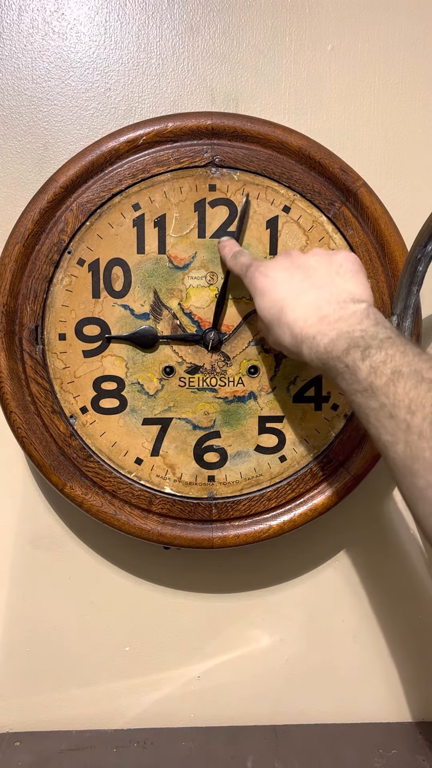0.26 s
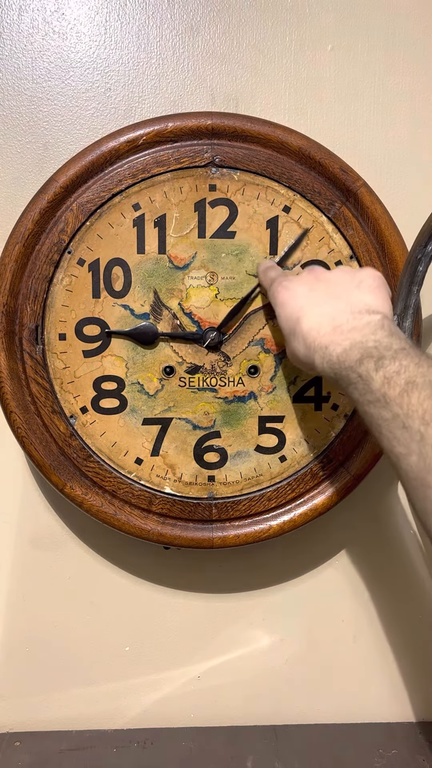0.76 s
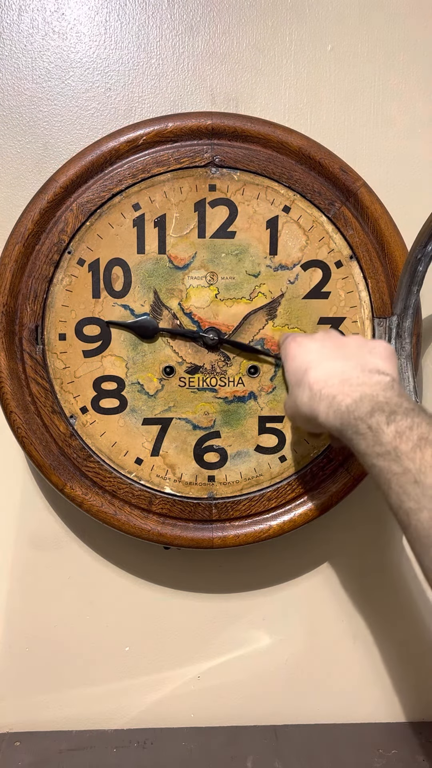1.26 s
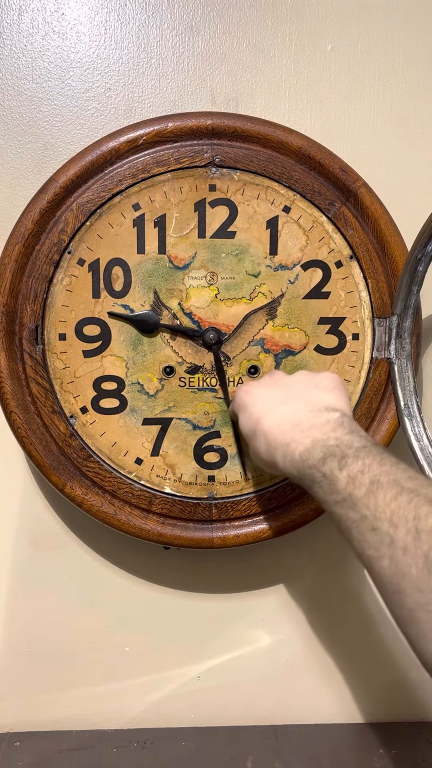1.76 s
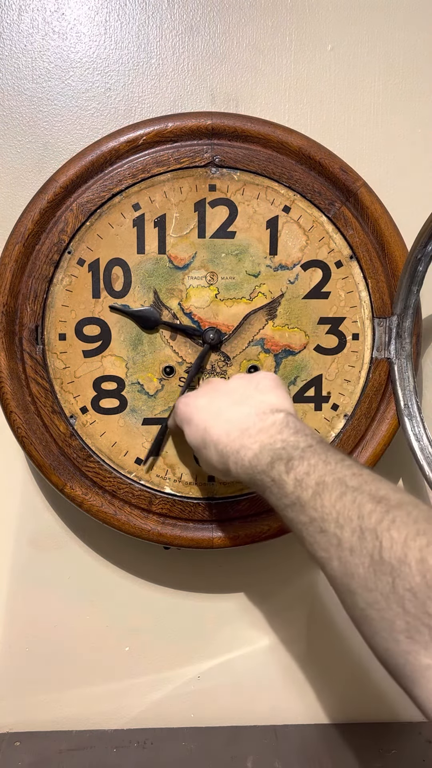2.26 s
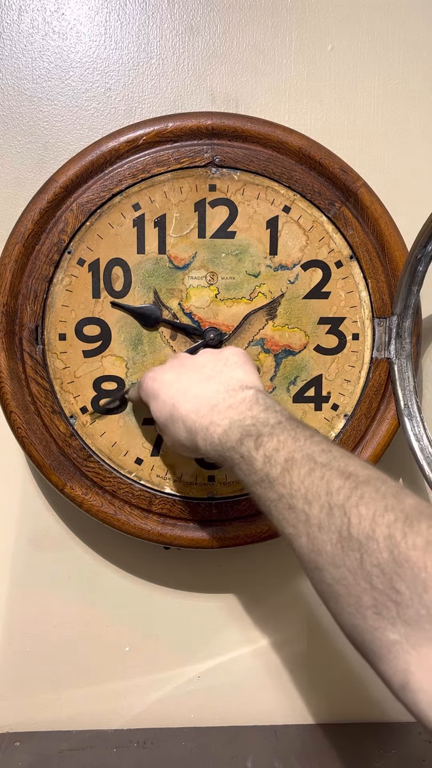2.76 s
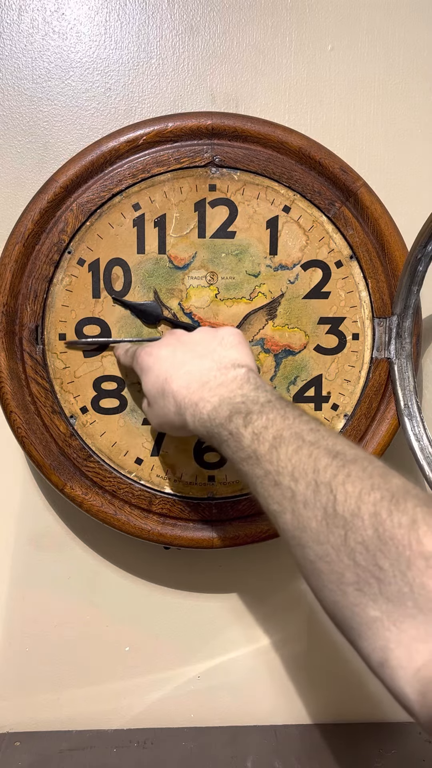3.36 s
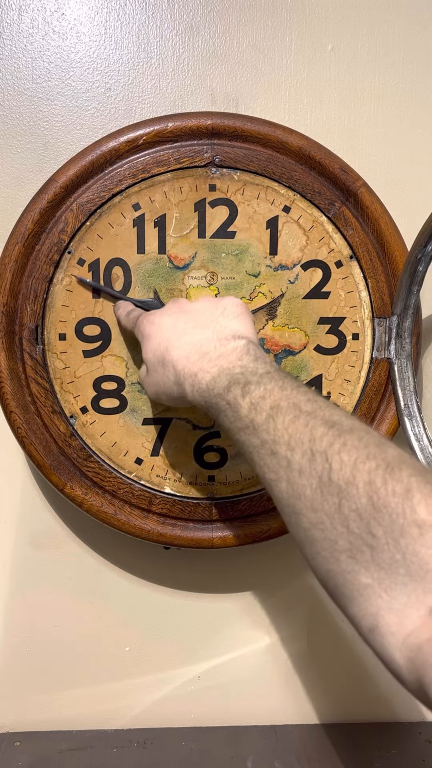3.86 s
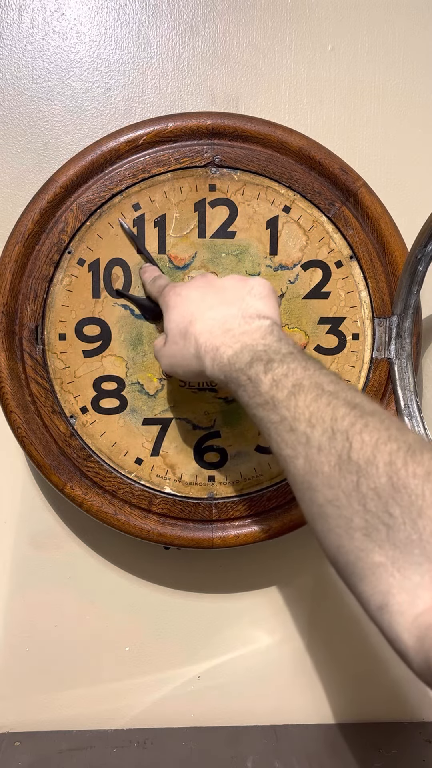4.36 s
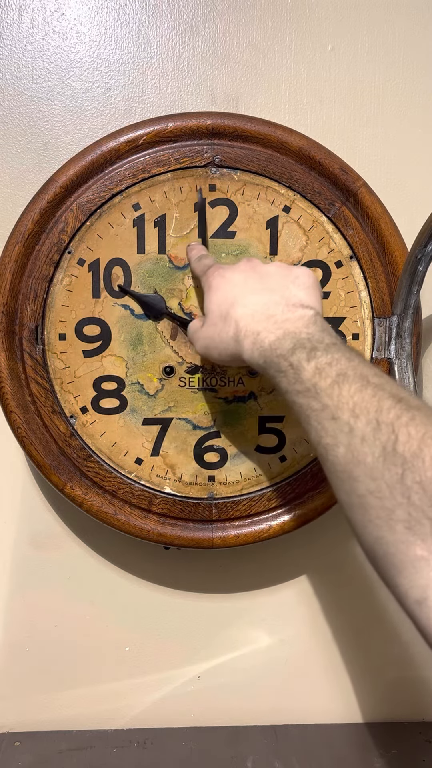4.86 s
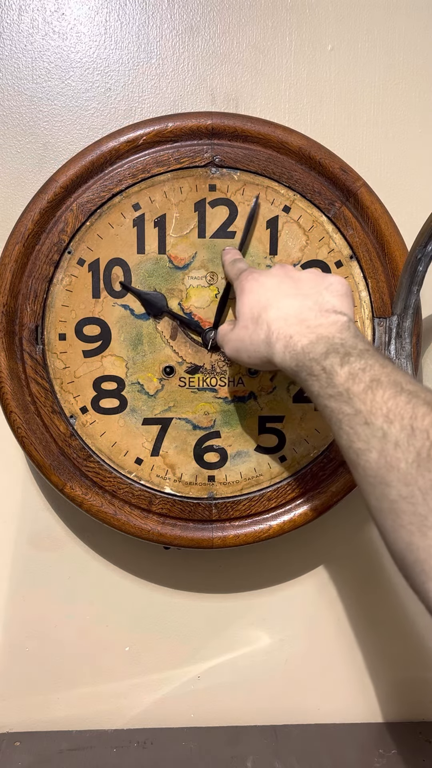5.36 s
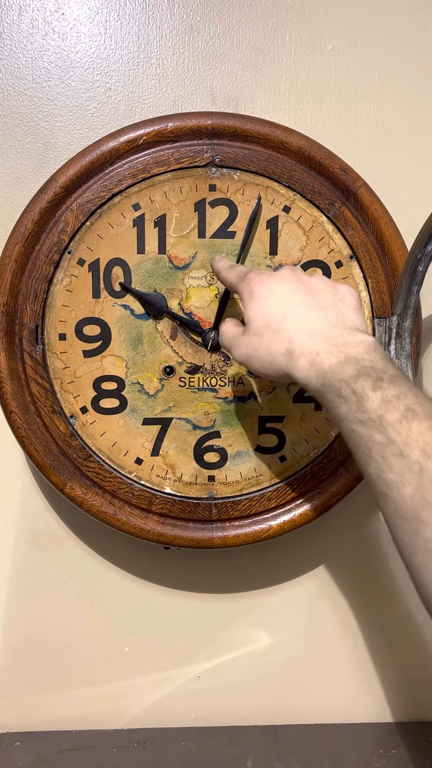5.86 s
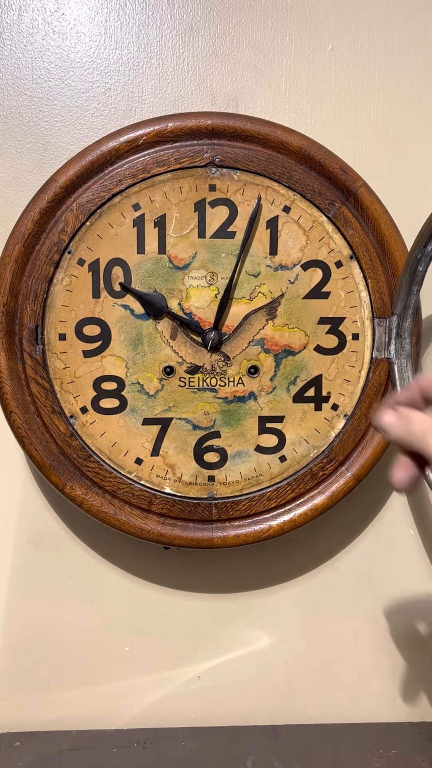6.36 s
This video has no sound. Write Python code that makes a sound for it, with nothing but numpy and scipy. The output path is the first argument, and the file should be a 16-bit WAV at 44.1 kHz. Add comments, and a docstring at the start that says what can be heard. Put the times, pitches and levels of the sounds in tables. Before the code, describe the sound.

Wooden clock knocks and ticks in a quiet humming room, soft friction rubs, a growing mechanical whirr, and a single metallic strike at the end.

```python
"""Setting a pendulum wall clock to the hour

In a quiet, faintly humming room a finger pushes the minute hand round: swarms of tiny slips groan and scrape.
The escapement ticks unevenly and levers knock: short bursts of contacts ring the modes of the wooden case.
The strike train's whirr, toothed noise through wheel resonances, grows louder until the hammer, a noise burst,
falls on a coiled wire gong made of decaying sine modes."""
import sys
import numpy as np
from scipy import signal
from scipy.fft import rfft, irfft
from scipy.io import wavfile
from scipy.ndimage import uniform_filter1d

SR = 44100
rng = np.random.default_rng(int(sys.argv[2]) if len(sys.argv) > 2 else 0)


def put_to_file(sound):
    """Save the sound as 16-bit audio at rate SR, in the file named by the first command-line argument."""
    columns = np.atleast_2d(sound).T  # one column per channel
    safe = np.clip(columns, -1, 1)
    whole_steps = np.round(safe * 32767)
    wavfile.write(sys.argv[1], SR, whole_steps.astype(np.int16))


N = 291942
TIME = np.arange(N) / SR
BINS = np.fft.rfftfreq(8192, 1 / SR)  # frequencies in Hz on which every colour is drawn
STRIKE_S = 6.526  # the hammer meets the gong


def amp(db):
    """Decibels to a linear factor."""
    return 10 ** (np.asarray(db) / 20)


def evened(x):
    """Scales to rms 1."""
    return x / np.sqrt(np.mean(x ** 2) + 1e-20)


def read(points, hz):
    """Reads a spectrum on a log-frequency axis."""
    f, value = np.transpose(points)
    return np.interp(np.log(hz + 1), np.log(f + 1), value)


def band(hz, octaves):
    """A bell on the log-frequency axis, 1 at its centre."""
    return np.exp(-.5 * (np.log2((BINS + 1) / hz) / octaves) ** 2)


def drift(size):
    """Smooth chance of rms 1 that changes over about size samples."""
    smooth = uniform_filter1d(rng.standard_normal(N), size)
    return evened(uniform_filter1d(smooth, size // 2))


def add(mix, s, sound):
    """Mixes a two-channel sound in at time s."""
    part = mix[:, round(s * SR):][:, :sound.shape[1]]
    part += sound[:, :part.shape[1]]


def body(spectrum, modes=()):
    """Gain of a broad spectrum with resonances standing on it; their powers add."""
    peaks = sum(amp(db) ** 2 / (1 + ((BINS - hz) / width) ** 2 * 2) ** 2 for hz, width, db in modes)
    return np.sqrt(amp(read(spectrum, BINS)) ** 2 + peaks)


def ring(x, gain):
    """Minimum-phase filter with the given gain: resonances ring after the blow, never ahead of it."""
    log_gain = np.log(np.r_[gain, gain[-2:0:-1]] + 1e-6)
    minimum_phase = np.exp(np.conj(signal.hilbert(log_gain)))
    response = np.fft.ifft(minimum_phase).real[:len(BINS)]
    return signal.fftconvolve(x, response[None], axes=1)[:, :x.shape[1]]


def ports(x):
    """Mid and side to left and right: wide in the middle range, near mono in bass, narrow about 1.9 kHz."""
    # Stereo width of the microphone pair. Each row: frequency in Hz, gain of the side signal in dB.
    side_width = [(40, -15.5), (120, -12), (300, -6.5), (600, -1), (1200, -4.5), (1750, -0.5), (1920, -17),
                  (3000, -9.5), (6000, 1.5), (8000, -4)]
    side_gain = amp(read(side_width, np.fft.rfftfreq(N, 1 / SR)))
    side = irfft(rfft(x[1]) * side_gain, N)
    return np.array([x[0] + side, x[0] - side])


def room_tail(size):
    """Diffuse reflections of energy 1, each band dying at its own speed."""
    # Reverberation of the room. Each row: frequency in Hz, time to fall by 60 dB in seconds.
    decay_times = [(150, 0.69), (500, 0.21), (1700, 0.23), (4500, 0.25), (10000, 0.17)]
    hz, t, grains = signal.stft(rng.standard_normal((2, size)), SR, nperseg=256)
    fading = grains * amp(-60 * t / read(decay_times, hz)[:, None])
    tail = signal.istft(fading, SR, nperseg=256)[1][:, :size]
    return evened(tail) / np.sqrt(size)


def still_room(air_db=-59.0, rumble_offset_db=60.5, rumble_hz=140, waver=.25):
    """Room tone: noise with a swelling low rumble and faint hiss, under sines that waver in level."""
    # Colour of the still air. Each row: frequency in Hz, relative density in dB per Hz.
    air_colour = [(15, -46.5), (25, -21.5), (31, -0.5), (45, 0.5), (80, -3), (115, -9), (150, -16.5),
                  (300, -23.5), (600, -37.5), (1100, -33), (1650, -23), (2100, -40), (4200, -50.5),
                  (6800, -58), (11000, -60), (12500, -73)]
    # Swells of the rumble. Each row: time in seconds, level in dB before rumble_offset_db is added.
    rumble_swells = [(0, -61.5), (.68, -55), (1.3, -58.5), (2.3, -62.5), (2.6, -58.5), (3.2, -61),
                     (4.35, -62.5), (4.7, -58), (6.1, -61), (6.4, -55)]
    # Mains and motor hum. Each row: frequency in Hz, rms level in dB before the waver.
    hum_tones = [(47, -67), (119.8, -68), (240, -82), (358, -84.5)]
    noise = rng.standard_normal((2, N + SR))
    air = amp(air_db) * evened(ring(noise, body(air_colour))[:, SR:])  # drops the filter's start-up
    rumble = signal.sosfiltfilt(signal.butter(2, rumble_hz, fs=SR, output="sos"), air)
    swell_db = np.interp(TIME, *np.transpose(rumble_swells)) + rumble_offset_db
    air = air + rumble * (amp(swell_db) - 1)
    hum = sum(amp(db) * np.sqrt(2) * np.sin(2 * np.pi * (hz * TIME + rng.random()))
              * (1 + waver * drift(size=6000)) for hz, db in hum_tones)
    return ports(air) + hum


def rub(s, length, db, hz, slips_per_s=1100, grain_db=1.0, octaves=0.26, skirt_db=-13, skirt_octaves=1, room_db=-5):
    """A short swarm of tiny slips that sounds one resonance; gives its start time and sound."""
    t = np.arange(SR // 3) / SR
    slips = (rng.random((2, len(t))) < slips_per_s / SR) * rng.choice([-1, 1], (2, len(t)))
    swell = np.sin(np.pi * np.minimum(t / length, 1)) ** 2
    slips = slips * amp(grain_db * rng.standard_normal(len(t))) * swell
    reflections = signal.fftconvolve(slips, room_tail(size=8192), axes=1)[:, :len(t)]
    slips = slips + amp(room_db) * reflections
    colour = band(hz, octaves) + amp(skirt_db) * band(hz, skirt_octaves) + amp(-60)
    sound = ring(slips, colour / (1 + (BINS / 7000) ** 10))  # soft skin makes no high treble
    return max(s - length / 2, 0), amp(db) * evened(sound) * np.sqrt(length / t[-1])  # db: rms over length


def rubs(count=38, step_s=.095, groan_hz=621, scrape_hz=2410, scatter_octaves=.11, scatter_db=1):
    """Stick-slip: the hand advances in uneven steps, as loud as the friction is high; a few rubs stand out."""
    # Friction of the pushed hand. Each row: time in seconds, groan of the clutch in dB,
    # scrape on the dial in dB, both before the scatter.
    friction = [(0, -89, -89), (.45, -74.5, -94), (.6, -74, -83), (1.15, -81, -95.5), (1.9, -80.5, -85.5),
                (2.3, -75, -82.5), (2.75, -75.5, -85), (3.1, -88.5, -92), (3.3, -87, -84.5),
                (3.7, -78, -83.5), (4.15, -85.5, -96), (4.35, -89, -79.5), (4.68, -71, -78.5),
                (4.95, -87, -82)]
    # Low groans to thin scrapes that stand out. Each row: middle in seconds, length in seconds,
    # level in dB, centre in Hz.
    loud_rubs = [(0.662, .086, -60.5, 317), (0.654, 0.18, -88.5, 7060), (.928, 0.096, -71.5, 577),
                 (2.347, 0.11, -67, 610), (2.601, .12, -66.5, 193), (3.686, 0.11, -74.5, 486),
                 (4.454, 0.11, -73, 560), (4.666, 0.17, -87.5, 5660), (6.335, 0.093, -59, 211)]
    out = np.zeros((2, N))
    times, groan_db, scrape_db = np.transpose(friction)
    steps = times[-1] * (np.arange(count) + rng.uniform(.15, .85, count)) / count
    for s, chance in zip(steps, rng.standard_normal((count, 2, 2))):
        for levels, hz, (loud, high) in zip([groan_db, scrape_db], [groan_hz, scrape_hz], chance):
            db = np.interp(s, times, levels) + scatter_db * loud
            add(out, *rub(s, step_s, db, hz * 2 ** (scatter_octaves * high)))
    for row in loud_rubs:
        add(out, *rub(*row))
    return out


def contacts(t, rebound, first, last, seat_s, rattle_s, rise_s=0.0015):
    """Metal lands, seats and rebounds; each contact spreads through the plates and rattles them briefly."""
    ages = np.maximum(t - np.array([[0], [seat_s], [rebound]]), 0)
    envelopes = (1 - np.exp(-ages / rise_s)) * np.exp(-ages / rattle_s)
    power = np.square([first, 1, last]) @ envelopes ** 2
    return rng.choice([-1, 1], (2, len(t))) * np.sqrt(power / power.sum())


def blows(rows, crack, case_db, first, last, seat_s, rattle_s, room_db, thud_octaves, bright_hz, length_s):
    """Each blow rings the case and the room; its level is the rms over length_s."""
    # Brass movement in its wooden case. Each row: mode in Hz, width in Hz, level in dB before case_db is added.
    case_modes = [(319, 57, -6), (480.5, 26.5, -9.5), (620.5, 31.6, -3.5), (1066, 57, -7.5),
                  (1287, 20, -1.5), (1396, 43, -5), (1657, 202, 1), (1668, 120, 2), (2037, 48, -4),
                  (2290, 260, -9), (2920, 43, -23), (3065, 38, -14.5), (4340, 140, -23.5),
                  (4685, 104, -22.5), (5970, 194, -25), (9800, 580, -37.5), (11900, 100, -70),
                  (11830, 250, -47)]
    out, t = np.zeros((2, N)), np.arange(SR // 2) / SR
    colour = body(crack, [(hz, width, db + read(case_db, hz)) for hz, width, db in case_modes])
    treble = 1 / (1 + (bright_hz / (BINS + 1)) ** 4)  # shelf that the brightness lifts or lowers
    for s, db, thud_db, thud_hz, bright_db, rebound in rows:
        drive = contacts(t, rebound, first, last, seat_s, rattle_s) + amp(room_db) * room_tail(len(t))
        tilt_db = thud_db * band(thud_hz, thud_octaves) + bright_db * treble
        sound = ring(drive, colour * amp(tilt_db))
        unit = sound / np.linalg.norm(sound, axis=1, keepdims=True)
        add(out, s, amp(db) * unit * np.sqrt(length_s * SR))
    return out


def escapement(thud_hz=(471, 980), bright_db=1.15):
    """Two pallets stop the escape wheel in turn, tick and tock; each has its own thud pitch and case drive."""
    # Beats, entry and exit pallet in turn. Each row: start in seconds, level in dB, wooden thud in dB,
    # last rebound in seconds after the start.
    ticks = [(.219, -56, 9, 0.019), (.694, -48.5, 7.5, 0.02), (1.293, -48, 11.5, 0.0076),
             (1.769, -48, 5, 0.013), (2.376, -49, 17.5, 0.013), (2.856, -49, 0.5, 0.018),
             (3.454, -49.5, 10.5, .019), (3.929, -47, 1.5, 0.015), (4.530, -47.5, 9, 0.0063),
             (5.617, -52.5, 4, 0.021), (6.110, -50.5, 0.5, .012)]
    # Broad crack of a pallet. Each row: frequency in Hz, level in dB.
    pallet_crack = [(100, -27), (250, -12.5), (800, -18.5), (1600, -10.5), (3300, -23.5), (5200, -30),
                    (7200, -44), (10500, -42.5), (12500, -78)]
    # How strongly each pallet drives the case modes. Each row: frequency in Hz, drive in dB.
    entry_drive = [(500, -0.5), (1300, -0.5), (1690, 1), (2030, 3.5), (2350, 2.5), (4700, 7.5), (6000, -23),
                   (10000, 5.5)]
    exit_drive = [(500, -2.5), (1300, 0), (1690, -2), (2030, 3.5), (2350, 0.5), (4700, 3), (6000, 2),
                  (10000, 2)]
    out = np.zeros((2, N))
    for k, drive in enumerate([entry_drive, exit_drive]):
        beats = [(s, db, thud_db, thud_hz[k], bright_db, rebound) for s, db, thud_db, rebound in ticks[k::2]]
        out += blows(beats, pallet_crack, drive, first=0.62, last=0.75, seat_s=0.008, rattle_s=0.012,
                     room_db=0, thud_octaves=0.25, bright_hz=2940, length_s=0.03)
    return out


def levers(rebound_s=.017):
    """Strike levers, gear slack and the loose hand knock in the case, with a broader thud than the ticks."""
    # Knocks. Each row: start in seconds, level in dB, wooden thud in dB, thud centre in Hz, brightness in dB.
    knocks = [(.262, -58, 6, 330, -2), (.312, -58, 16.5, 460, 2), (.583, -59.5, 14.5, 417, 10.5),
              (0.611, -53, 17, 500, -7), (0.796, -56.5, 14.5, 390, -22), (1.022, -69, 20, 395, 22),
              (1.425, -59.5, 13.5, 376, -7), (2.215, -56.5, 20, 296, -16), (2.584, -56, 28.5, 700, -12),
              (2.687, -65.5, 35, 960, 3), (4.710, -49.5, 4.5, 348, 10), (5.002, -52, 1, 400, 6.5),
              (5.012, -44.5, 5, 330, 3), (5.448, -65.5, 14, 262, -1), (5.555, -55.5, 11, 300, -23),
              (5.995, -72, -9, 403, 11)]
    # Broad crack of a lever. Each row: frequency in Hz, level in dB.
    lever_crack = [(100, -23), (280, 5.5), (500, -12.5), (800, -12), (1300, -8), (2200, -9.5),
                   (3200, -13.5), (5500, -27.5), (8000, -40.5), (11000, -37), (12800, -82)]
    # How strongly the levers drive the case modes. Each row: frequency in Hz, drive in dB.
    lever_drive = [(300, 9), (620, 9.5), (1300, 6.5), (1690, 0), (2350, 4.5), (4700, 3.5), (10000, -1)]
    return blows([(*row, rebound_s) for row in knocks], lever_crack, lever_drive, first=0.8, last=0.76,
                 seat_s=0.0037, rattle_s=0.013, room_db=1.0, thud_octaves=1.0, bright_hz=2780, length_s=0.024)


def strike_train(teeth_hz=150, wheel_hz=21.87, wobble=0.15, clatter_hz=2600):
    """Teeth mesh in quick uneven scrapes that ring the wheels; the whirr grows and its treble flutters."""
    # Course of the whirr. Each row: time in seconds, level in dB, extra tooth clatter in the treble in dB.
    train = [(5.05, -83, 2), (5.2, -74, 1.5), (5.35, -65.5, 4), (5.5, -64.5, 2.5), (5.75, -63, 1.5),
             (5.9, -64, 8.5), (6.1, -65.5, 7), (6.27, -61, 8), (6.42, -62.5, 4), (6.62, -55.5, 7)]
    # Wheels and fan. Each row: resonance in Hz, width in Hz, level in dB.
    wheel_modes = [(179, 14.8, 12.5), (303, 140, 0), (480, 42, -27), (648, 51, -1.5), (1012, 26, 3),
                   (1360, 100, -2.5), (1589, 88, 5.5), (1746, 80, 1.5), (1860, 68, 2), (2320, 82, -11),
                   (3120, 180, -13.5), (3610, 104, -13), (4325, 86, -15), (5400, 640, -20.5),
                   (6495, 56, -14.5), (7200, 180, -23.5)]
    # Broad hiss beneath them. Each row: frequency in Hz, level in dB.
    hiss = [(100, -15), (300, -11), (800, -7), (1600, -12.5), (2200, -11.5), (4000, -26.5), (7200, -36),
            (8200, -39.5), (11000, -56), (13000, -81)]
    s, db, clatter_db = np.transpose(train)
    turns = np.cumsum(1 + 0.052 * drift(size=4000)) / SR  # running time at a slightly unsteady speed
    tooth_phase = turns * teeth_hz % 1
    mesh = .55 + np.exp(-tooth_phase / .25) * amp(3 * drift(size=200))
    mesh = mesh * (1 + wobble * np.sin(2 * np.pi * wheel_hz * turns))
    whirr = evened(ring(mesh * rng.standard_normal((2, N)), body(hiss, wheel_modes)))
    clatter = signal.sosfiltfilt(signal.butter(2, clatter_hz, "high", fs=SR, output="sos"), whirr)
    flutter_db = 1.1 * drift(size=1500)
    whirr = whirr + clatter * (amp(np.interp(TIME, s, clatter_db) + flutter_db) - 1)
    return whirr * amp(np.interp(TIME, s, db)) * (TIME > s[0])


def hammer(blow_db=-33, blow_s=0.016, buzz_db=-43, buzz_s=0.43):
    """The hammer's crack dies fast over the longer, uneven buzz of the shaken coil and case."""
    # Hammer noise. Each row: frequency in Hz, relative level in dB.
    clang = [(100, -8.5), (250, -3), (800, -10), (1300, -10), (1700, 2.5), (2300, -14.5), (3300, -21),
             (4800, -30.5), (7000, -43), (11000, -34), (15000, -60)]
    out, t = np.zeros((2, N)), np.arange(SR // 2) / SR
    colour = evened(body(clang))
    rattle = amp(2.5 * drift(size=220)[:len(t)])
    level = amp(blow_db) * np.exp(-t / blow_s) + amp(buzz_db) * np.exp(-t / buzz_s) * rattle
    add(out, STRIKE_S, ring(level * rng.choice([-1, 1], (2, len(t))), colour))
    return out


def gong(ring_s=4):
    """The coiled wire rings with dozens of inharmonic modes, each swelling in and dying 60 dB over ring_s."""
    # Modes of the coil. Each row: frequency in Hz, level in dB before beating, left over right in dB,
    # phase lead of the left in radians, swell time constant in seconds.
    coil_modes = [(187, -49, 4, -.9, .006), (255, -50, -8, -.4, .006), (327, -41, -8, 0, .007),
                  (410, -41, -11, -.3, .007), (615, -27, -1, 1.1, .075), (732, -46, 13, 2.4, .008),
                  (855, -45, 5, -2.7, .004), (982, -46, 1, 0, .003), (1119, -42, 6, 1.8, .003),
                  (1266, -40, 5, 1.6, .003), (1419, -44, 1, -1.7, .002), (1582, -35, -8, 1.6, .002),
                  (1686, -48, -3, 0, .002), (1753, -41, -6, -1.4, .002), (1928, -41, 0, 0, .002),
                  (2020, -54, 0, 0, .002), (2110, -41, 0, 0, .002), (2298, -41.5, 0, 0, .002),
                  (2496, -50, 5, 0, .002), (2699, -58, 0, 0, .002), (2913, -50, 1, .3, .002),
                  (3130, -60, 2, 0, .002), (3593, -58, 2, 0, .002), (3826, -57, 4, 0, .002),
                  (4080, -66, 0, 0, .002), (4326, -55, 2, 0, .03), (4571, -69, 5, 0, .002),
                  (4822, -67, 2, 0, .002), (5080, -61, 4, 0, .002)]
    # Upper overtones. Each row: frequency in Hz, level in dB before each overtone's random strength.
    shimmer = [(5300, -70), (6500, -73.5), (7500, -77.5), (9000, -71.5), (10500, -75), (12200, -90),
               (13200, -89), (15600, -78)]
    out, t = np.zeros((2, N)), np.arange(SR // 2) / SR
    sides = np.array([[.5], [-.5]])
    # a stiff wire's overtones climb as the square of their number, each struck with its own strength
    overtones = (71.3 + 1.87 * np.arange(1, 30)) ** 2 + 12 * rng.standard_normal(29)
    levels = read(shimmer, overtones) + rng.uniform(-6, 6, len(overtones))
    upper = [(hz, db, 0, 0, coil_modes[-1][-1]) for hz, db in zip(overtones, levels)]
    for hz, db, pan_db, lead, swell_s in list(coil_modes) + upper:
        wave = np.sin(2 * np.pi * (hz * t + rng.random()) + lead * sides)
        # the coil swings in two planes at slightly different pitches, so its high modes beat
        beat = np.sin(2 * np.pi * (rng.uniform(5, 22) * t + rng.random()))
        wave = wave * (1 + min(hz / 8000, .8) * beat)
        decay = amp(db + pan_db * sides - 60 * t / ring_s)
        add(out, STRIKE_S, decay * (1 - np.exp(-t / swell_s)) * wave)
    return out


def scene():
    """The clock's noises, leaning slightly to the right, with the gong and the room tone."""
    clock = rubs() + escapement() + levers() + strike_train() + hammer()
    return still_room() + ports(clock) * amp([[-.7], [.7]]) + gong()


def record(dry):
    """Low cut at 26 Hz and a steep band limit at 15.9 kHz."""
    dry = signal.sosfilt(signal.butter(4, 26, "high", fs=SR, output="sos"), dry)
    band_limit = signal.firwin(511, 15900, window=("kaiser", 9), fs=SR)
    return signal.oaconvolve(dry, band_limit[None], "same")


dry = scene()
out = record(dry)
put_to_file(out)
```